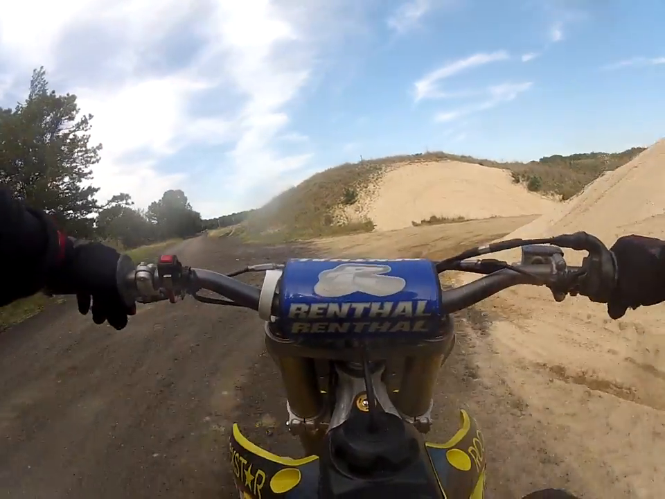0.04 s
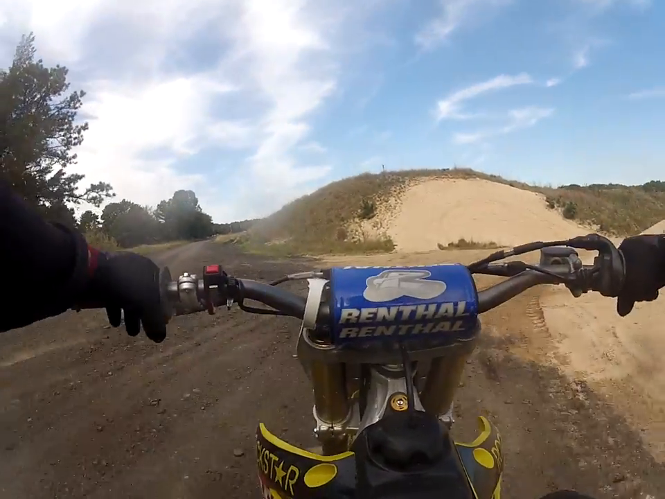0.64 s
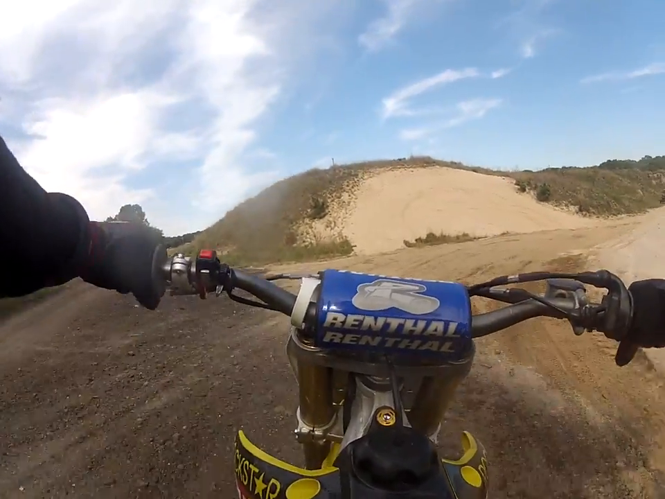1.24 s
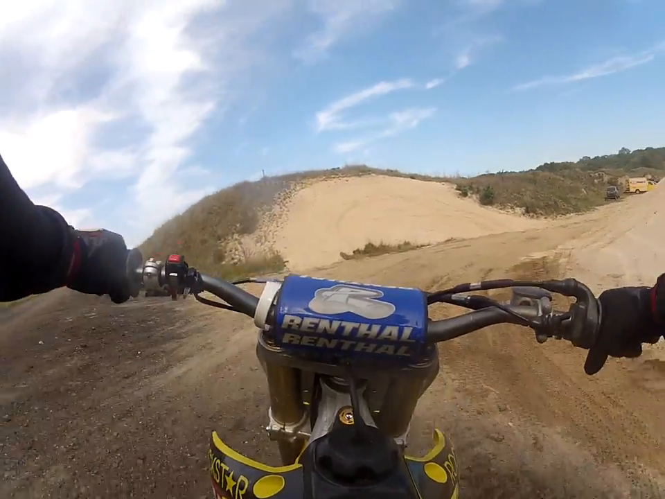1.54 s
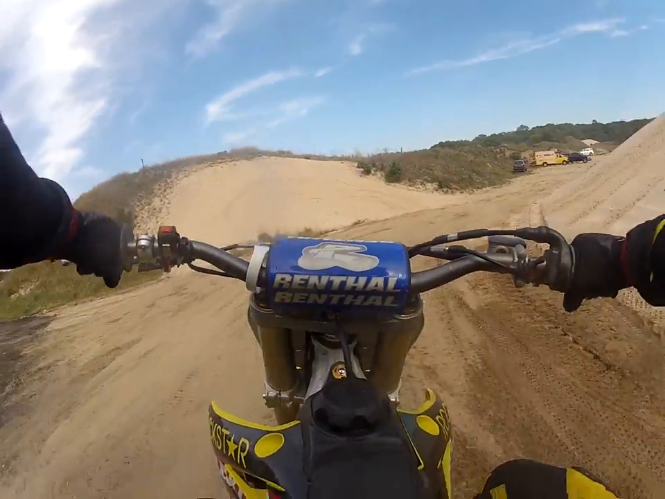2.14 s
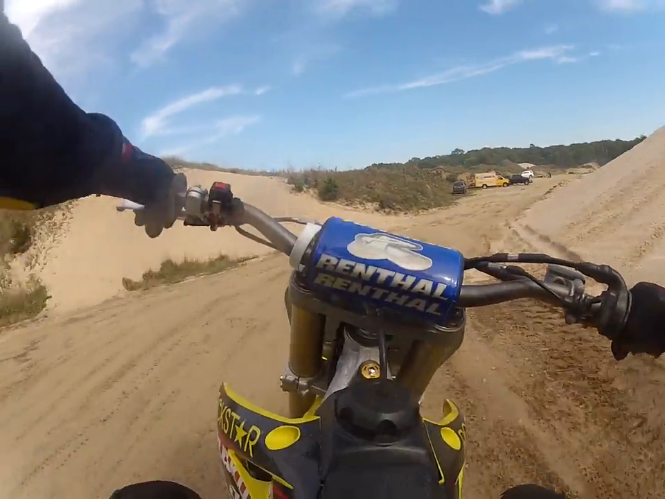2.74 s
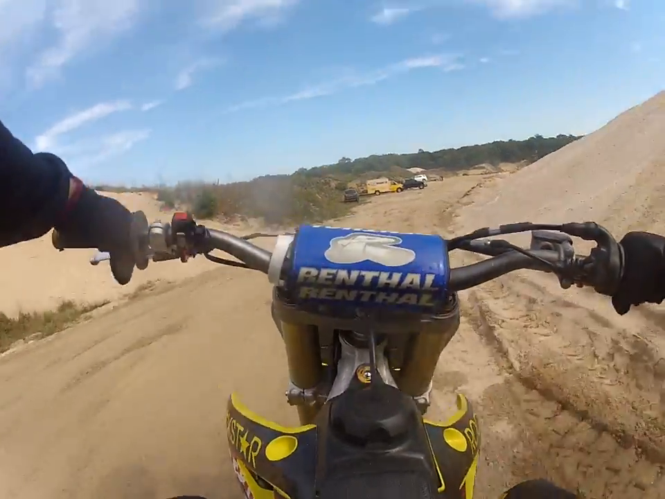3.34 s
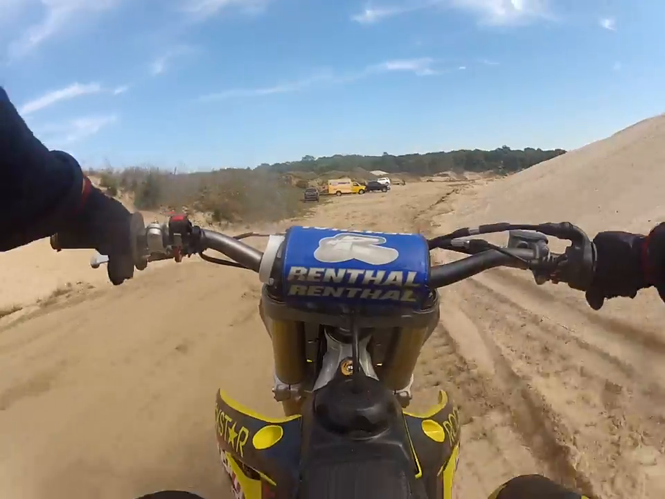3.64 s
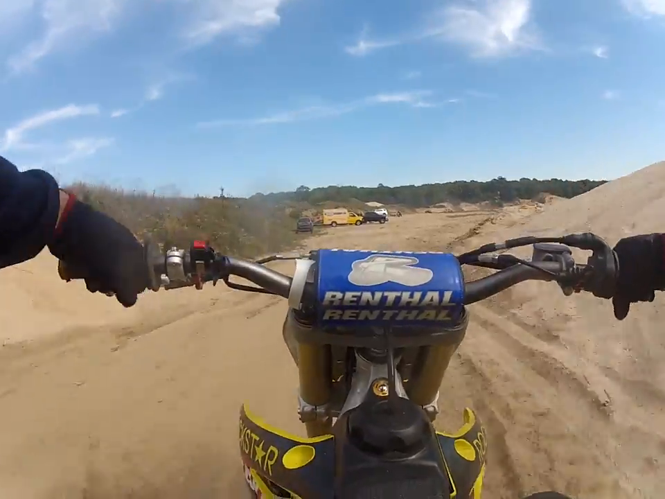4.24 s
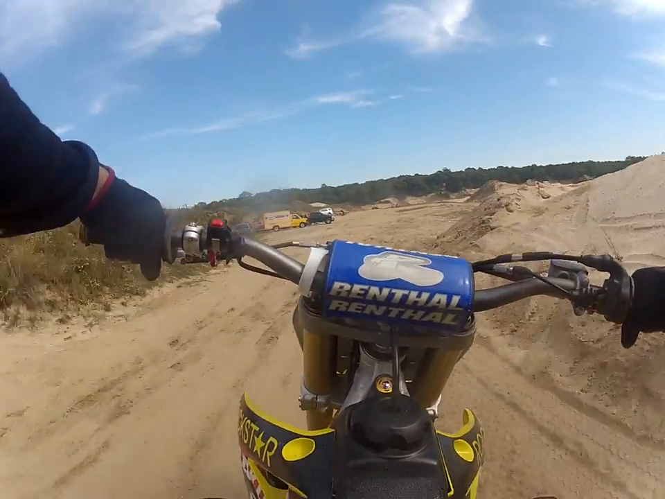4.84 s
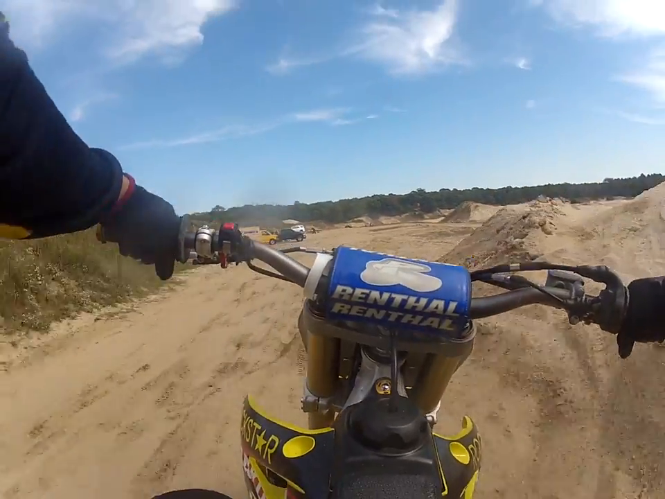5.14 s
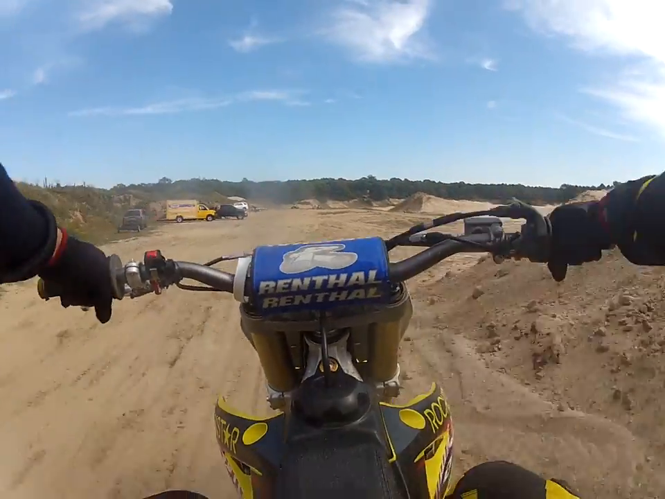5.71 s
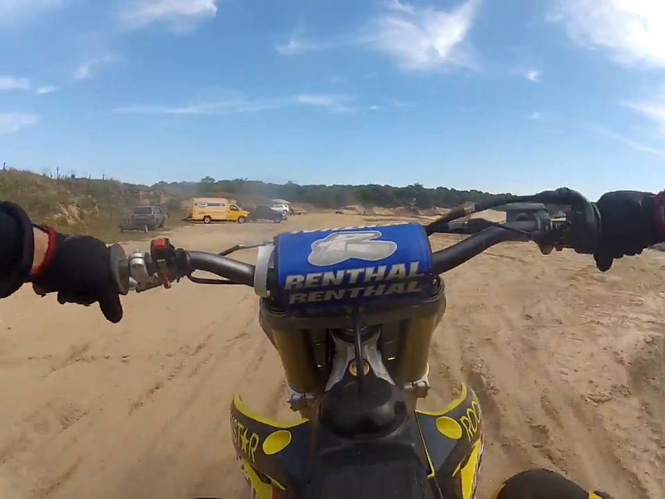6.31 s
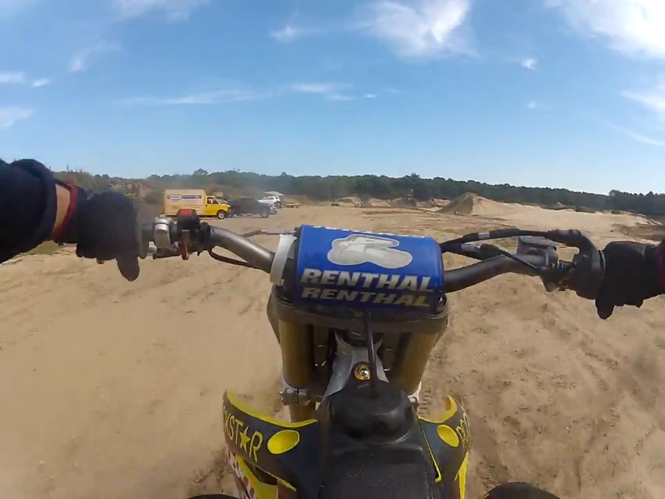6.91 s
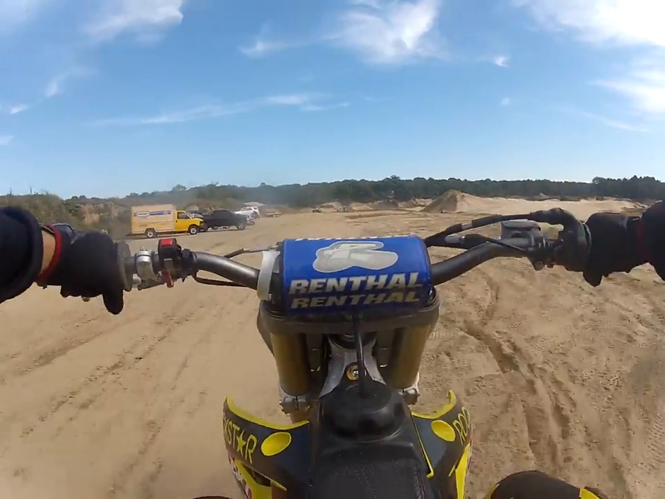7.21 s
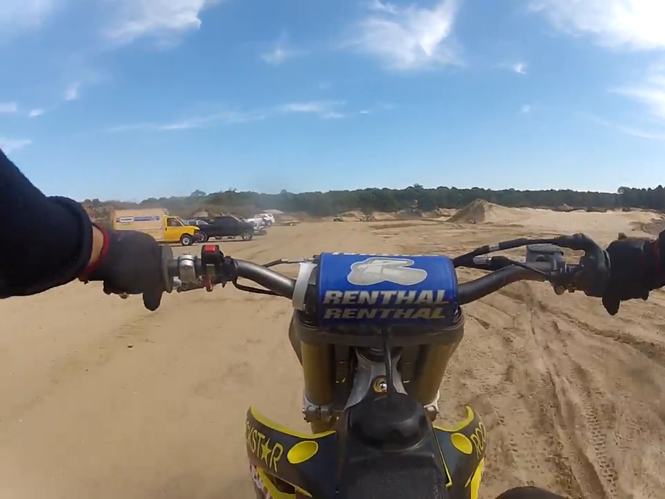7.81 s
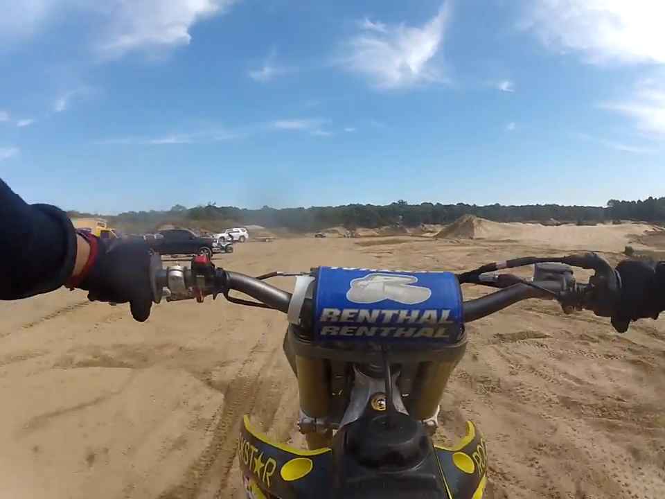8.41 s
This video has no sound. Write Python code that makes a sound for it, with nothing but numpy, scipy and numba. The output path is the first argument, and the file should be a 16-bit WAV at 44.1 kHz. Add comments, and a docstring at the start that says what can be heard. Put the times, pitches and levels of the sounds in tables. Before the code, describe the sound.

A four-stroke dirt bike is heard close up from the rider's helmet on a sandy trail. It first coasts with a loping exhaust and light ticking from valves and chain. The engine catches with a cough and climbs unevenly to a steady speed, thumping and rattling, while gears, tyres in the sand and wind rumble grow louder. Near the end the throttle shuts for a moment and opens again.

```python
"""Four-stroke single-cylinder dirt bike on sand, heard from a camera on the rider's helmet.
For 2 s it coasts, throttle shut: the exhaust lopes, tappets and chain tick. It catches with a cough
and pulls up to a steady speed by 6.5 s; each firing thumps through pipe and airbox and rattles the head,
while gears, tyres and wind grow louder. Just after 8 s the throttle shuts for a moment."""
import sys
import numpy as np
from scipy import signal
from scipy.fft import rfft, irfft
from scipy.io import wavfile
from scipy.ndimage import uniform_filter1d
from numba import njit

SR = 44100
rng = np.random.default_rng(int(sys.argv[2]) if len(sys.argv) > 2 else 0)


def materialize(psi):
    """Save the field psi as 16-bit PCM at rate SR to the path in sys.argv[1].

    A 1-D psi becomes a single channel; in a 2-D psi each row is a channel.
    """
    bounded = np.clip(np.atleast_2d(psi).T, -1, 1)
    quanta = np.round(bounded * 32767).astype(np.int16)
    wavfile.write(sys.argv[1], SR, quanta)


N = 373086
T = np.arange(N) / SR
CRUISE_HZ = 48  # firing rate at steady speed


def exhaust(turn, hz, throttle, thump_db, growl_db):
    """Pressure pulses ring pipe and airbox, coloured by the throttle; stray burns while coasting."""
    # spectrum of one firing: f/Hz, level/dB
    idle_eq = [(15, -81), (48, -10.5), (75, 1), (105, -6.5), (135, -16.5), (190, 3.5), (245, -9.5),
               (295, -4.5), (370, -28), (480, -53), (620, -22), (1600, -88)]  # shut, low revs
    overrun_eq = [(15, -61), (60, -25), (90, -11.5), (140, -5.5), (185, 5), (235, -10), (300, -15),
                  (390, -32), (500, -22), (800, -35), (1700, -83)]  # shut, high revs
    light_eq = [(15, -112), (60, -8), (105, 1.5), (190, 4), (255, -9.5), (325, 6), (370, -6.5), (415, -36),
                (480, -19), (560, -30), (670, -17), (900, -50), (1270, -17.5), (2500, -94)]
    half_eq = [(15, -62), (68, -11), (105, -19), (140, -5.5), (195, 5), (255, -5), (295, -7), (335, -1),
               (365, -5.5), (435, -29.5), (490, -14), (570, -27), (680, -19), (880, -30.5), (1230, -22.5),
               (1520, -35.5), (4000, -62), (9000, -82)]
    pulling_eq = [(15, -56), (70, -13), (108, -26), (145, -8), (198, 4.5), (232, 0), (262, 0), (305, -10),
                  (352, -5), (385, -14), (435, -28), (505, -18), (570, -24), (660, -20), (880, -32),
                  (1250, -24), (1520, -40), (4000, -70), (9000, -88)]  # three quarters open
    wide_eq = [(15, -42), (50, -14), (140, -29), (165, -1), (190, 4.5), (252, 2.5), (300, 0.5), (340, -10),
               (385, -26), (485, -15), (570, -22.5), (690, -17.5), (850, -33), (1280, -47), (1550, -38),
               (4000, -49), (9000, -70)]
    # throttle values for shut, light, half, pulling, wide
    openings = (0, 1, 2, 2.5, 3)
    # stray burns: t/s, level over one cycle/dB
    stray_burns = [(.056, -43), (.252, -44), (.453, -43), (.825, -43), (.953, -40.5), (1.082, -41.5),
                   (1.255, -43), (1.969, -39), (2.111, -36)]
    shut, light, wide = np.clip([1 - throttle, 2 - throttle, throttle - 2], 0, 1)
    fast = revving(hz)
    idle = shut * (1 - fast)
    pulses = firings(turn, hz, scatter_db=.55 + .8 * idle, jitter_s=.00006) * lope()
    turbulence = unit(noise() * window(turn, centre=.17, width=.25))
    gas = pulses + (undb(-25) + undb(-20) * idle) * turbulence
    # crossfade neighbouring spectra
    shares = [idle, shut * fast] + [np.interp(throttle, openings, row) for row in np.eye(5)[1:]]
    spectra = idle_eq, overrun_eq, light_eq, half_eq, pulling_eq, wide_eq
    thump = sum(colour(gas * share, eq) for share, eq in zip(shares, spectra))
    level_db = -25.5 + 1.5 * shut - 1.5 * light - wide + thump_db
    thump *= by_speed(hz, level_db, db_per_octave=3.5 + 10 * shut)
    growl = silencer(gas) * by_speed(hz, -49 + growl_db, db_per_octave=12)
    burns = colour(strikes(stray_burns) * np.sqrt(SR / hz), light_eq)
    return growl - thump - burns


def lope(span_s=.06):
    """Gain that makes single idle beats stronger or weaker."""
    # uneven beats: t/s, level re ordinary beat/dB
    beats = [(.02, 2.5), (.1, 3), (.22, 2), (.5, 2), (.81, 0.5), (.875, -1), (1.03, -4), (1.135, 2),
             (1.355, 1), (1.55, 0), (1.755, 2), (1.885, -0.5), (1.94, -5), (2.055, -7)]
    beat_s, beat_db = np.transpose(beats)
    span = int(span_s * SR)
    marks = np.bincount((beat_s * SR).astype(int), beat_db, N)
    return undb(span * uniform_filter1d(marks, span, mode="constant"))


def silencer(gas, return_s=.0042):
    """The pulse returns from the silencer's end and rings its chambers."""
    # chamber modes: f/Hz, nominal width/Hz, level/dB
    modes = [(490, 46, 5), (578, 73, 2), (658, 105, 6.5), (925, 105, 0.5), (1080, 86, -6)]
    returned = np.interp(T - return_s, T, gas)
    return unit(sum((-1) ** k * undb(db) * ring(returned, f, 2 * w) for k, (f, w, db) in enumerate(modes)))


def clatter(turn, hz, road_hz, throttle, rasp_db, settle_s=.43):
    """Valves, piston and combustion rattle the metal at set crank angles; the gas rasps in step."""
    fast, shut = revving(hz), np.clip(1 - throttle, 0, 1)
    idle = shut * (1 - fast)
    combustion = window(turn, centre=.26 - .08 * fast, width=.06) * (.3 + 1.1 * fast)
    valves = window(turn, centre=.86 - .08 * fast, width=.042) * (.85 + 1.7 * (1 - fast) ** 3)
    stroke = window(turn, centre=.1 + .22 * fast, width=.23 - .09 * fast)
    piston = 1.5 * window(turn, centre=.06, width=.045) + 1.1 * window(turn, centre=.63, width=.07)
    force = 1 + (1 - idle) * (combustion + valves + (1 - .95 * fast) * stroke) + idle * piston
    # the same teeth and rollers meet on every turn
    grain = repeat(noise(), SR / hz, likeness=.68)
    rattle = metal(grain * force) * (1 - .2 * fast) + knocks(turn, hz)
    bark = .8 + (1 - shut) * ((3 - 2 * fast) * stroke + .6 * valves) + .6 * shut * piston
    mix = rattle + undb(rasp_db) * rasp(hz, bark)
    effort = uniform_filter1d(throttle, int(settle_s * SR))
    coasting, light, wide = np.clip([1 - effort, 2 - effort, effort - 2.4], 0, 1)
    level_db = -33.5 + 1.5 * coasting - 4.5 * light + 3.5 * wide + .5 * walk(hz=41)
    return mix * by_speed(road_hz, level_db, db_per_octave=7)


def knocks(turn, hz):
    """Hard blows on the metal at high revs, three a cycle."""
    # blows: phase/cycles, level/dB
    angles = [(.2, 0), (.47, -6), (.77, -3)]
    fast = revving(hz)
    blows = sum(undb(db) * firings(turn - angle, hz, scatter_db=1.3 * fast, jitter_s=.000025)
                for angle, db in angles)
    return undb(-2.5) * fast * metal(blows)


def metal(force):
    """Ring of the engine's metal and the camera's case."""
    # modes: f/Hz, nominal width/Hz, level/dB
    modes = [(1200, 440, -24.5), (1273, 28, -2.5), (2129, 99, 10), (2233, 161, 11.5), (2985, 62, 1),
             (3420, 73, -1), (3736, 247, -8)]
    return unit(sum(undb(db) * ring(force, f, 1.19 * w) for f, w, db in modes))


def rasp(hz, bark):
    """Broad crackle of exhaust gas under the envelope bark."""
    # gas spectrum: f/Hz, level/dB
    gas_eq = [(300, -20), (700, -5), (1150, 9), (1500, -9.5), (1850, 15.5), (2600, 3), (3500, 2),
              (4600, -13.5), (6000, -19), (8000, -7.5), (12000, -30)]
    crackle = undb(6 * noise()) * noise()
    return colour(unit(repeat(crackle, SR / hz, likeness=.5) * bark), gas_eq)


def piston_slap(turn, shut):
    """Dull mid-cycle slap of the piston while coasting."""
    slaps = noise() * (.3 + window(turn, centre=.6, width=.06))
    return undb(-59) * shut * unit(ring(slaps, hz=690, width_hz=330))


def tappets(turn, shut):
    """Valve tappets tick once a cycle while coasting."""
    taps = noise() * window(turn, centre=.74, width=.04)
    return undb(-59) * shut * unit(ring(taps, hz=2957, width_hz=160))


def crank(turn, hz):
    """The unbalanced crank hums at twice the firing rate."""
    return unit(np.sin(4 * np.pi * turn)) * by_speed(hz, -39.5 + walk(hz=27), db_per_octave=13)


def gearbox(turn, hz, shut):
    """Gears and chain churn, harder on each power stroke, softer unloaded."""
    # churn spectrum: f/Hz, level/dB
    churn_eq = [(150, -11), (420, -10), (640, -0.5), (850, -3), (1120, 1), (1290, 8), (1500, -9),
                (2500, 1.5), (5000, -13.5), (9000, -50)]
    push = 1 + .5 * window(turn, centre=.05, width=.35)
    churn = colour(unit(noise() * push), churn_eq)
    return churn * by_speed(hz, -43.5 - 4 * shut + 1.9 * walk(hz=30), db_per_octave=4)


def gear_whine(turn, teeth_per_cycle=32, case_hz=1250):
    """One gear pair sings as its pitch sweeps through the cases' resonance."""
    mesh = 2 * np.pi * teeth_per_cycle * turn
    whine = unit(walk(hz=127) * np.sin(mesh) + walk(hz=126) * np.cos(mesh))
    return undb(-46) * ring(whine, case_hz, width_hz=274)


def chain(shut, jingles=320, decay_s=.0042):
    """Chain slap and grit ring the frame; the slack chain jingles faintly while coasting."""
    # hits: t/s, level/dB
    ticks = [(.093, -35), (.172, -36), (.202, -44), (.599, -33.5), (.745, -31), (.823, -35), (.888, -38),
             (.924, -37), (1.094, -40), (1.253, -34), (1.293, -33), (1.312, -38), (1.44, -35.5), (1.5, -33),
             (1.548, -36), (1.565, -44), (1.63, -31), (1.677, -37), (1.869, -37), (1.877, -41),
             (1.939, -42), (2.015, -42), (2.07, -38), (2.143, -29), (3.235, -32), (3.315, -33.5),
             (3.558, -28), (6.143, -31), (7.929, -27), (7.941, -26), (8.249, -28)]
    # frame modes, plus the converter's mirror tone near 7.3 kHz: f/Hz, nominal width/Hz, level/dB
    tick_ring = [(1180, 470, 4.5), (1985, 270, 12.5), (2950, 220, 9), (4540, 900, 5), (7270, 2200, -3)]
    when, softness = rng.random((jingles, 2)).T
    jingle = strikes(np.c_[when * T[-1], -44 - 6 * softness]) * shut
    decay = np.exp(-T[:SR // 20] / decay_s)
    bursts = signal.fftconvolve(strikes(ticks) + jingle, decay)[:N] * noise()
    return sum(undb(db) * ring(bursts, f, w) for f, w, db in tick_ring)


def low_thumps(decay_s=.016):
    """The engine's cough as it catches, then bumps on the camera; each dies in a few swings."""
    # cough, then bumps: t/s, level/dB, f/Hz
    thumps = [(2.128, -17, 105), (2.146, -24, 50), (6.968, -17, 46), (7.092, -20, 40), (7.82, -24, 47),
              (7.925, -28, 40), (8.251, -24, 49)]
    out = np.zeros(N)
    for start_s, db, hz in thumps:
        age_s = np.clip(T - start_s, 0, .3)
        out += undb(db) * np.sin(2 * np.pi * hz * age_s) * np.exp(-age_s / decay_s)
    return out


def tyres(hz):
    """Tyres rush through sand and spray it against the mudguards."""
    # spectra: f/Hz, level/dB
    rush_eq = [(200, -18), (420, -10.5), (620, 3), (850, -13), (1100, -13), (2000, -51)]
    spray_eq = [(2000, -20), (3900, -1), (5300, 1.5), (6100, -10), (7500, 0.5), (11000, -26)]
    rush = colour(noise(), rush_eq) * by_speed(hz, -51, db_per_octave=13)
    grains = unit(noise() * undb(4 * noise()))
    return rush + colour(grains, spray_eq) * by_speed(hz, -52 + walk(hz=23), db_per_octave=13)


def wind(hz):
    """Gusty rumble of air over the helmet."""
    # rumble spectrum: f/Hz, level/dB
    rumble_eq = [(8, -46), (22, -10.5), (48, -13), (90, -13.5), (160, -13), (350, -18.5), (1000, -42),
                 (4000, -79)]
    return colour(noise(), rumble_eq) * by_speed(hz, -39.5 + walk(hz=4.5), db_per_octave=9)


def firings(turn, hz, scatter_db, jitter_s):
    """One impulse a cycle, scattered in size and time; mean power near 1."""
    at = np.flatnonzero(np.diff(np.floor(turn)) > 0)
    size, timing = rng.standard_normal((len(at), 2)).T
    db = 10 * np.log10(SR / hz[at]) + scatter_db[at] * size
    return strikes(np.c_[T[at] + jitter_s * timing, db])


def strikes(rows):
    """One impulse per row of t/s, level/dB."""
    s, db = np.transpose(rows)
    return np.bincount((np.abs(s) * SR).astype(int), undb(db), N)[:N]


def window(turn, centre, width):
    """Gaussian bump once a cycle; centre and width in cycles."""
    return np.exp(-.5 * (((turn - centre + .5) % 1 - .5) / width) ** 2)


def by_speed(hz, cruise_db, db_per_octave):
    """Gain rising with the revs; cruise_db at CRUISE_HZ."""
    return undb(cruise_db + db_per_octave * np.log2(hz / CRUISE_HZ))


def revving(hz):
    """0 at low revs, 1 near cruising speed."""
    return np.clip((hz - 28) / 15, 0, 1)


def ring(x, hz, width_hz):
    """Two equal resonators in series, each width_hz wide; gain 1 at hz."""
    b, a = signal.iirpeak(hz, hz / width_hz, fs=SR)
    return signal.lfilter(b, a, signal.lfilter(b, a, x))


def colour(x, points, size=8192):
    """Minimum-phase filter of unit energy, shaped by rows of f/Hz, level/dB."""
    hz, db = np.transpose(points)
    f = np.maximum(np.fft.rfftfreq(size, 1 / SR), 1)
    gain = undb(np.interp(np.log(f), np.log(hz), db))
    cepstrum = irfft(np.log(gain))
    cepstrum[1:size // 2] *= 2
    cepstrum[size // 2 + 1:] = 0
    response = irfft(np.exp(rfft(cepstrum)))
    return signal.fftconvolve(x, response / np.linalg.norm(response))[:N]


@njit
def repeat(x, period, likeness):
    """Each cycle of x partly repeats the last; period in samples."""
    y = x.copy()
    for i in range(len(x)):
        j = i - int(period[i] + .5)
        if j >= 0:
            y[i] = likeness * y[j] + np.sqrt(1 - likeness ** 2) * x[i]
    return y


def curves(rows):
    """One piecewise linear curve per column after t/s."""
    s, *columns = np.transpose(rows)
    return [np.interp(T, s, column) for column in columns]


def walk(hz):
    """Smooth random drift, rms 1."""
    span = int(SR / hz)
    return unit(uniform_filter1d(uniform_filter1d(noise(), span), span))


def noise():
    """White noise."""
    return rng.standard_normal(N)


def unit(x):
    """Scale to rms 1."""
    return x / np.sqrt(np.mean(x ** 2))


def undb(db):
    """Decibels to gain."""
    return 10 ** (np.asarray(db) / 20)


def scene():
    """Revs and throttle drive the bike in one gear; the crank angle times the engine."""
    # engine speed: t/s, firing rate/Hz
    revs = [(0.0, 25.85), (0.68, 24.24), (0.81, 23.22), (2.07, 21.87), (2.28, 32.07), (2.36, 34.45),
            (2.68, 25.52), (2.76, 25.06), (3.08, 29.74), (3.24, 26.23), (3.4, 27.61), (3.56, 31.42),
            (3.64, 29.35), (3.88, 32.61), (3.96, 31.45), (4.04, 34.23), (4.2, 33.93), (4.28, 34.92),
            (4.36, 33.91), (4.52, 35.72), (4.6, 34.9), (4.76, 37.86), (4.92, 39.67), (5.0, 38.33),
            (5.16, 40.32), (5.32, 43.15), (5.4, 41.55), (5.56, 43.11), (5.64, 45.31), (5.8, 44.85),
            (5.96, 47.79), (6.04, 45.58), (6.2, 49.63), (6.28, 48.19), (6.36, 49.28), (6.44, 46.59),
            (6.76, 51.23), (6.92, 47.74), (7.08, 47.3), (7.16, 48.6), (7.32, 48.83), (7.4, 47.91),
            (7.56, 48.25), (7.64, 47.24), (7.8, 49.65), (7.96, 47.0), (8.04, 49.73), (8.12, 48.92),
            (8.2, 42.47), (8.36, 52.78)]
    # twist grip: t/s, opening (0 or less shut, 1 light, 2 half, 3 or more wide)
    grip = [(2.09, -1), (2.17, 2), (2.33, 2), (2.65, 1.2), (3.05, 2.06), (3.3, 1.62), (3.55, 2),
            (3.95, 1.95), (4.07, 2.5), (5.1, 2.5), (5.45, 4.5), (6.8, 4.5), (7.05, 2.8), (7.95, 5.5),
            (8.07, 6), (8.083, 0), (8.228, 0), (8.25, 5.5)]
    # engine voice trims: t/s, thump/dB, growl/dB, rasp/dB
    voices = [(0, -2, -34, -2.5), (2.1, 3, -33, -4), (2.19, -3, 1, -8), (2.35, 0.5, -3, -8),
              (2.55, -1, 7.5, -16), (2.75, -1, -7, -4.5), (3.1, 0, 2, -5), (3.26, 0, -7, -6),
              (3.54, 0, 7, -1.5), (3.85, -.5, .5, -5), (4.4, 1, -4.5, -5.5), (4.85, 0.5, -6, -5.5),
              (5.3, 1, 1, -5.5), (6.75, 0, -1.5, -4.5), (7.2, 0, 0.5, -9), (7.95, 0.5, -1, -9),
              (8.07, -2, -18, -7), (8.1, -3.5, -11, -4.5), (8.23, -1.5, -13, -11), (8.28, 0.5, -1, -9)]
    hz, throttle = curves(revs) + curves(grip)
    thump_db, growl_db, rasp_db = curves(voices)
    shut = np.clip(1 - throttle, 0, 1)
    turn = .43 + np.cumsum(hz) / SR  # engine cycles, two crank turns each
    road_hz = uniform_filter1d(hz, int(.25 * SR))  # the bike's mass evens out the revs
    engine = exhaust(turn, hz, throttle, thump_db, growl_db) + crank(turn, hz)
    engine += clatter(turn, hz, road_hz, throttle, rasp_db) + piston_slap(turn, shut) + tappets(turn, shut)
    drive = gearbox(turn, road_hz, shut) + tyres(road_hz) + gear_whine(turn) + chain(shut)
    return (engine + drive + low_thumps() + wind(road_hz))[None]


def record(dry):
    """The camera's converter mirrors the sound about its own rate as a thin sizzle; the top is cut."""
    converter_hz, top_hz = 12000, 15050
    band = signal.sosfilt(signal.butter(1, 220, "high", fs=SR, output="sos"), dry)
    band = signal.sosfilt(signal.butter(2, 3800, fs=SR, output="sos"), band)
    sizzle = undb(6) * np.gradient(band, axis=-1) * np.cos(2 * np.pi * converter_hz * T)
    sizzle = signal.sosfilt(signal.butter(1, 13000, fs=SR, output="sos"), sizzle)
    return signal.sosfilt(signal.ellip(8, .2, 70, top_hz, fs=SR, output="sos"), dry + sizzle)


dry = scene()
out = record(dry)
materialize(out)
```